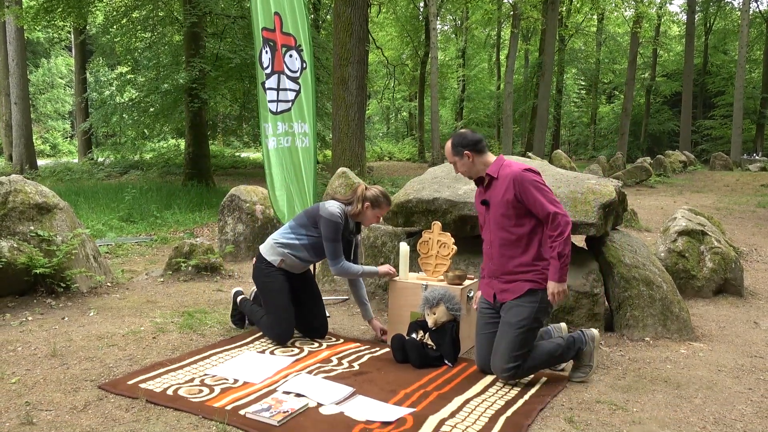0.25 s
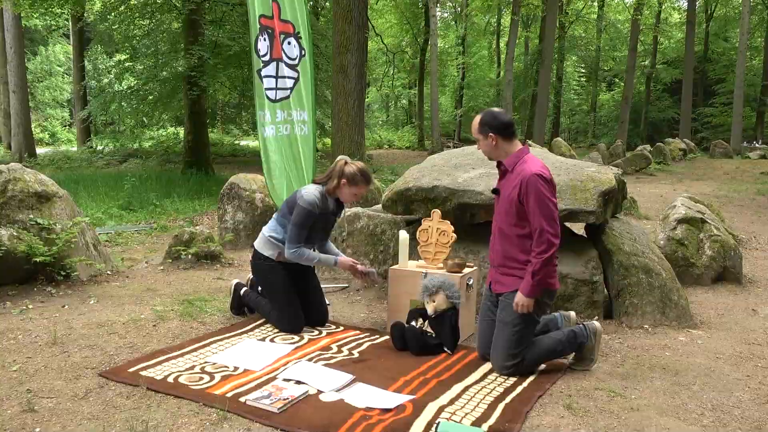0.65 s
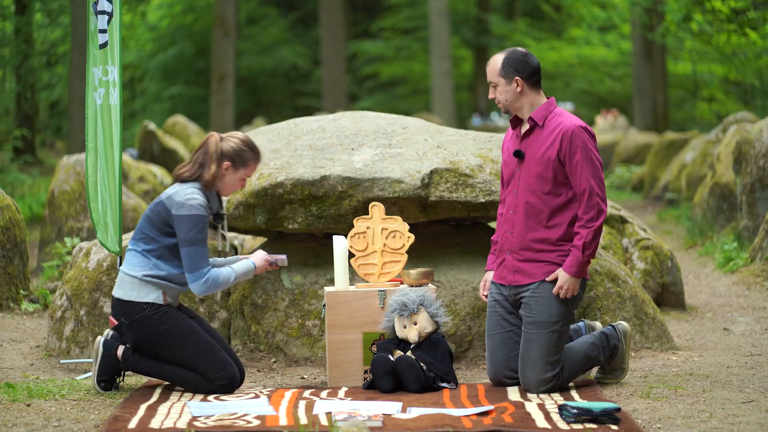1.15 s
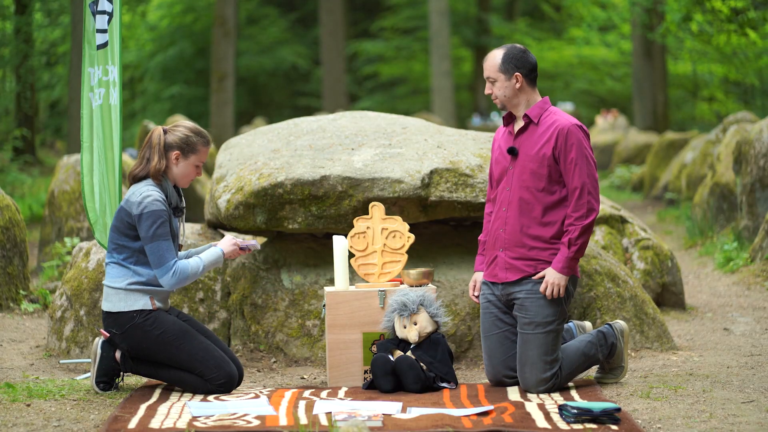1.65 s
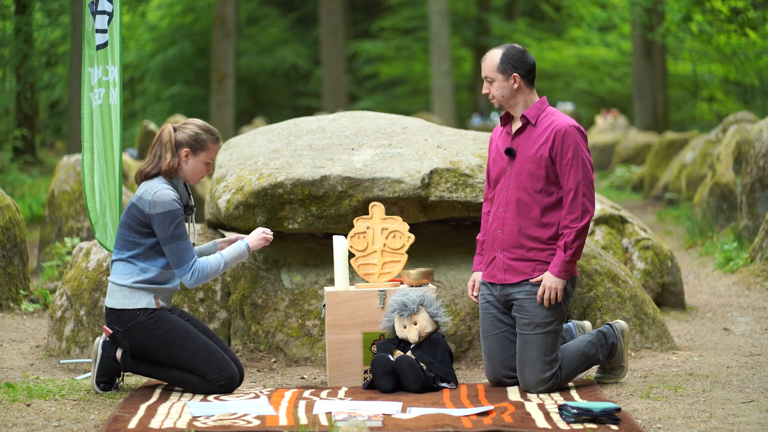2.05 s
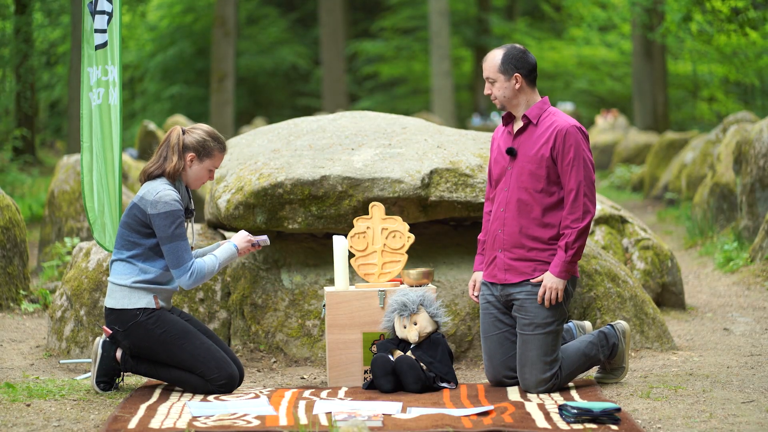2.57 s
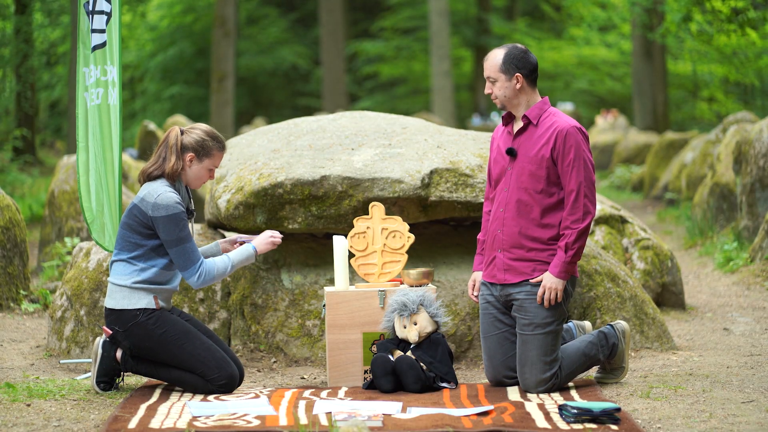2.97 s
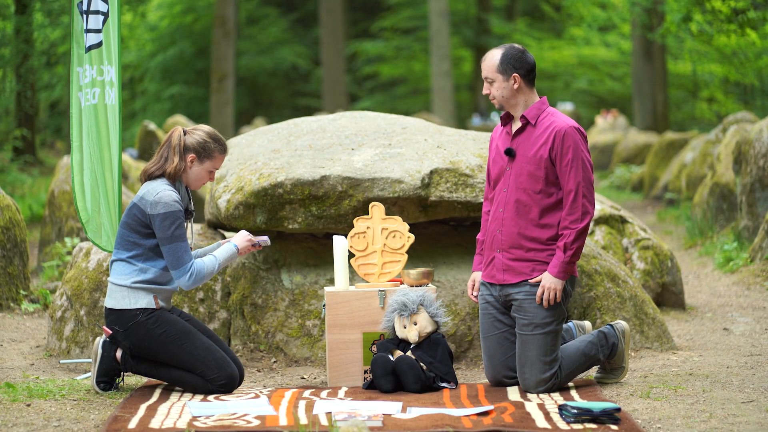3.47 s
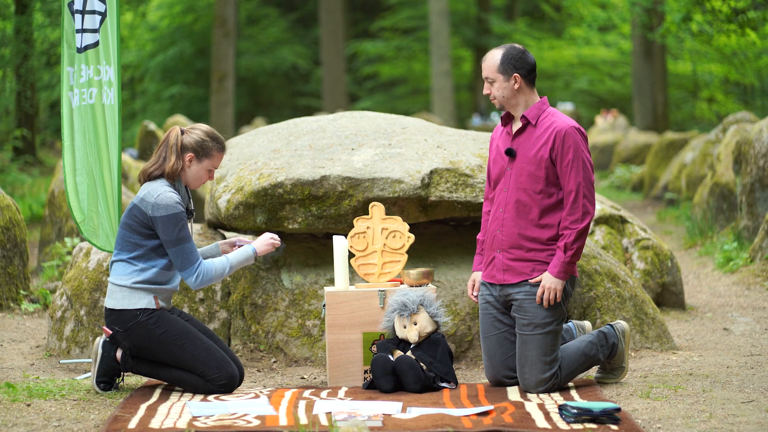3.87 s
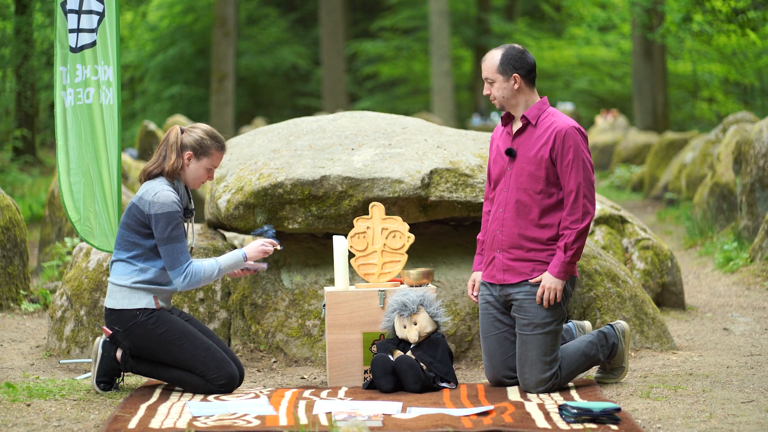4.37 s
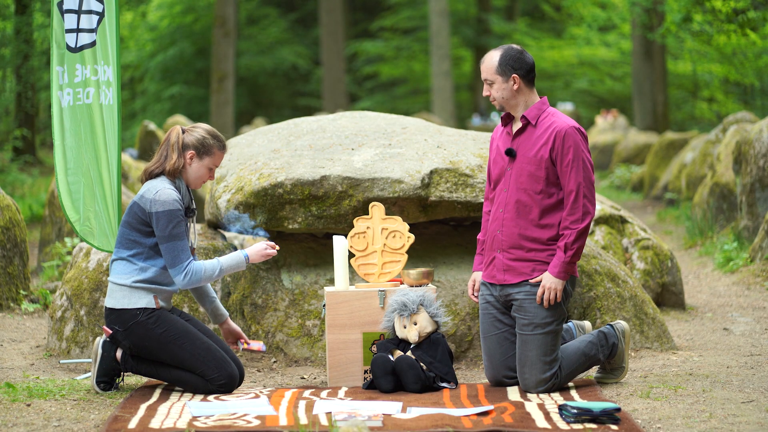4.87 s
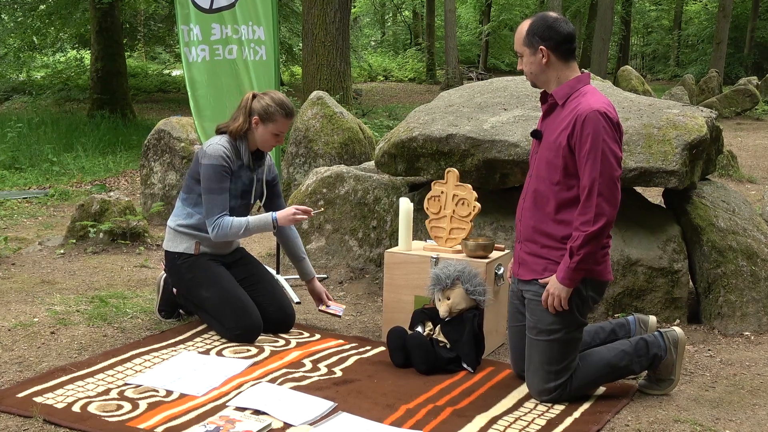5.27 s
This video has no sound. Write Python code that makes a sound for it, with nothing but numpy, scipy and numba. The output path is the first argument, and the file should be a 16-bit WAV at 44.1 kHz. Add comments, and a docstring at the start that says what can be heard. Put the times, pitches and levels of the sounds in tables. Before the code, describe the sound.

In a birdsong-filled forest clearing, a match scrapes a matchbox three times, the last harshest, then a faint hiss of flame.

```python
"""A forest clearing: birds sing and a far engine drones while a match is struck, microphone worn on the chest.
Head and grit: random clicks ring two gliding box notes, with slips and snaps as separate knocks.
Three strokes, with a light brush before the second; after the last, filtered clicks hiss as the flame.
The sleeve rubs as clumped clicks through cloth resonances; small ticks and soft rustles sit close by.
Leaves are coloured noise, the engine two wavering sines, the birds gliding whistles with an echo."""
import sys
import numpy as np
from scipy import signal
from scipy.fft import rfft, irfft
from scipy.io import wavfile
from numba import njit

SR = 44100
rng = np.random.default_rng(int(sys.argv[2]) if len(sys.argv) > 2 else 0)


def bounce(signal):
    """Save signal as a 16-bit WAV file at the path given by the first command-line argument."""
    frames = np.transpose(np.atleast_2d(signal))
    limited = np.clip(frames, -1, 1)
    pcm = np.round(limited * 32767).astype(np.int16)
    wavfile.write(sys.argv[1], SR, pcm)


N = 243592
TIME = np.arange(N) / SR


def from_db(db):
    """Decibels to an amplitude factor."""
    return 10 ** (np.asarray(db) / 20)


def rms_one(x):
    """Scale a sound to rms 1."""
    return x / np.sqrt(np.mean(x ** 2) + 1e-20)


def in_time(tables, fade_s=.006):
    """Join the columns of short tables along the time line, after a gate that is open inside each table."""
    start_s, *columns = np.transpose(np.vstack(tables))
    gate = np.zeros(N)
    for table in tables:
        first_s, last_s = table[0][0], table[-1][0]
        gate += np.interp(TIME, [first_s - fade_s, first_s, last_s, last_s + fade_s], [0, 1, 1, 0])
    return [gate] + [np.interp(TIME, start_s, column) for column in columns]


def swell(loudest_s, level_db, rise_s, fall_s):
    """Gain that climbs 20 dB to its top and falls 20 dB again, straight in dB; signs of the times ignored."""
    before = (loudest_s - TIME) / abs(rise_s)
    after = (TIME - loudest_s) / abs(fall_s)
    return from_db(level_db - 20 * np.where(TIME < loudest_s, before, after))


def colour(x, spectrum):
    """Filter a sound by a curve of dB over frequency, joined on a log axis; rms 1."""
    hz, db = np.transpose(spectrum)
    grid_hz = np.maximum(np.arange(len(x) // 2 + 1) * SR / len(x), 1)
    gain_db = np.interp(np.log(grid_hz), np.log(hz), db)
    return rms_one(irfft(rfft(x) * from_db(gain_db), len(x)))


def resonate(x, hz, width_hz):
    """Two-pole resonance, gain 1 on top."""
    r = np.exp(-np.pi * width_hz / SR)
    feed = np.array([1, 0, -1]) * (1 - r * r) / 2
    return signal.lfilter(feed, [1, -2 * r * np.cos(2 * np.pi * hz / SR), r * r], x)


def resonate_twice(x, hz, width_hz):
    """Two equal fixed resonances in a row for steeper sides; rms 1."""
    return rms_one(resonate(resonate(x, hz, width_hz), hz, width_hz))


@njit
def gliding(x, hz, width_hz, rate):
    """Resonance whose centre moves sample by sample."""
    out, r = np.zeros(len(x)), np.exp(-np.pi * width_hz / rate)
    for i in range(2, len(x)):
        turn = 2 * r * np.cos(2 * np.pi * hz[i] / rate)
        out[i] = x[i] - x[i - 2] + turn * out[i - 1] - r * r * out[i - 2]
    return out


def glide_twice(x, hz, width_hz):
    """Two equal moving resonances in a row for steeper sides; rms 1."""
    return rms_one(gliding(gliding(x, hz, width_hz, SR), hz, width_hz, SR))


def drift(rate_hz):
    """Slow random wander: noise through two low-pass poles, rms 1, started a second early to settle."""
    r = np.exp(-2 * np.pi * rate_hz / SR)
    return rms_one(signal.lfilter([1], [1, -2 * r, r * r], rng.standard_normal(N + SR))[SR:])


def grains(per_s, spread_db):
    """Random clicks of uneven size and either sign; rms 1."""
    sizes = from_db(spread_db * np.minimum(rng.exponential(1, N), 5)) * rng.choice([-1, 1], N)
    return rms_one(sizes * (rng.random(N) < per_s / SR))


def knocks(rows, t60_s, sharpness, skirt):
    """Each row (start_s, peak_db, pitch_hz): a hard contact and dying rattle through two resonances."""
    out, after_s = np.zeros(N + SR), np.arange(SR // 12) / SR
    noise = rng.standard_normal((len(rows), len(after_s)))
    for (start_s, peak_db, hz), push in zip(rows, noise):
        push[0] = 5   # the first contact
        width_hz = hz / sharpness
        ring = resonate(push * from_db(-60 * after_s / t60_s), hz, skirt * width_hz)
        ring = resonate(ring, hz, width_hz)
        at = round(start_s * SR)
        out[at:at + len(after_s)] += from_db(peak_db) * ring / abs(ring).max()
    return out[:N]


# the clearing, lifted once the striking starts: start_s [s], air_db [dB], rumble_db [dB]
CLEARING = [(0, -67, -66), (.5, -68, -67.5), (1, -65, -70.5), (1.7, -67, -68), (1.79, -58.5, -59),
            (2.1, -58.5, -54), (3.7, -58, -51.5), (4.3, -55, -52), (4.7, -54, -52.5), (5.1, -55, -54.5),
            (5.52, -57.5, -51.5)]
# tone of the air: pitch_hz [Hz], density_db [dB per Hz]
AIR_TONE = [(53, -18.5), (90, -5.5), (103, -9.5), (192, -12.5), (353, -13), (393, -14.5), (510, -12.5),
            (896, -12.5), (1640, -18), (3220, -29.5), (5200, -32), (8500, -35), (15000, -36.5),
            (16000, -41.5)]
# far engine, its two lowest orders: pitch_hz [Hz], level_db [dB over the rumble]
ENGINE_ORDERS = [(34.5, -4.5), (70.5, 0.5)]
# a dull hum far off: loudest_s [s], level_db [dB], rise_s [s per 20 dB], fall_s [s per 20 dB]
PASSING_HUM = (0.92, -65.5, 0.14, 1.4)


def forest():
    """Leaves and far traffic as coloured noise over a ground rumble, with an engine wavering in it."""
    _, air_db, rumble_db = in_time([CLEARING])
    air = colour(rng.standard_normal(N), AIR_TONE) * from_db(air_db + .7 * drift(3))
    warped_s = np.cumsum(1 + .01 * drift(2)) / SR   # engine speed wavers by 1 %
    engine = sum(from_db(level_db + 2.0 * drift(8.3)) * np.sin(2 * np.pi * hz * warped_s)
                 for hz, level_db in ENGINE_ORDERS)
    ground = from_db(-7) * resonate_twice(rng.standard_normal(N), 42, 50)
    hum = swell(*PASSING_HUM) * rms_one(resonate(rng.standard_normal(N), 364, 48))
    return air + from_db(rumble_db) * (engine + ground) + hum


# far birds blur into a high haze that rises, then slowly fades:
# loudest_s [s], level_db [dB], rise_s [s per 20 dB], fall_s [s per 20 dB, sign ignored by swell()]
BIRD_HAZE = (2.1, -78, 4, -12.5)
# single notes: start_s [s], length_s [s], first_hz, middle_hz, last_hz [Hz], level_db [dB]
BIRD_NOTES = [(.052, .065, 5600, 4750, 3500, -71), (.158, .062, 6000, 4750, 3500, -71),
              (.495, .07, 4350, 4550, 5500, -71), (.668, .068, 4350, 4550, 5600, -73),
              (.84, .06, 4300, 4550, 5300, -72), (1.02, .06, 4300, 4600, 5500, -74),
              (1.315, .03, 5900, 4900, 4300, -74), (1.575, .027, 5800, 4700, 4000, -74),
              (1.695, .06, 3220, 3220, 3220, -78), (2.105, .085, 4150, 4150, 4150, -73),
              (2.175, .04, 7100, 5300, 4400, -69), (2.28, .05, 7000, 7350, 7450, -75),
              (2.335, .05, 7400, 5300, 4300, -69), (2.425, .07, 6300, 7200, 7300, -73),
              (2.497, .05, 7200, 5200, 4200, -69), (2.66, .045, 7300, 5700, 4500, -71),
              (4.06, .14, 2480, 2470, 2460, -65), (4.24, .11, 2460, 2450, 2440, -67),
              (4.58, .12, 2270, 2260, 2240, -65)]
ECHO_DB, ECHO_T60_S = -38, .4   # gain and decay of what the trunks return


def birds():
    """Near-sine whistles gliding through three pitches, with an echo off the trunks and a haze of noise."""
    notes = np.zeros(N)
    flutter_db = 2.5 * drift(90)   # leaves and moving air make the level flutter
    for start_s, length_s, first_hz, middle_hz, last_hz, level_db in BIRD_NOTES:
        u = np.arange(round(length_s * SR)) / (length_s * SR)
        hz = np.polyval(np.polyfit([0, .5, 1], [first_hz, middle_hz, last_hz], 2), u)
        whistle = np.sin(np.pi * u) ** .5 * np.sin(2 * np.pi * np.cumsum(hz) / SR)
        at = round(start_s * SR)
        notes[at:at + len(u)] += from_db(level_db + flutter_db[at:at + len(u)]) * whistle
    tail_s = np.arange(SR // 4) / SR
    tail = rng.standard_normal(SR // 4) * from_db(-60 * tail_s / ECHO_T60_S)
    haze = swell(*BIRD_HAZE) * resonate_twice(rng.standard_normal(N), 5400, 3200)
    return notes + haze + from_db(ECHO_DB) * signal.fftconvolve(notes, tail)[:N]


# soft rustles of hands: loudest_s [s], level_db [dB], rise_s, fall_s [s per 20 dB]
HAND_RUSTLES = [(.262, -62.5, 0.033, 0.1), (.54, -65, 0.017, 0.15), (.72, -75, 0.12, 0.25),
                (.91, -64, 0.19, 0.05), (4.972, -50, 0.065, 0.073), (5.08, -58, .08, 0.18),
                (5.3, -65, .2, 0.17), (5.51, -56, 0.05, 0.054)]
UPPER_DB, CRACKLE_DB = -3.5, -13.5   # over the low note of the rustle
CRACKLES_PER_S = 170


def hands():
    """Skin and card rubbing softly on two notes of the box, with loose crackles."""
    rub = grains(3700, 3.3)
    low = resonate_twice(rub, 900, 380)
    upper = resonate_twice(rub, 2100, 610)
    crackle = rms_one(resonate(grains(CRACKLES_PER_S, 1.6), 2700, 4000))
    rustle = low + from_db(UPPER_DB) * upper + from_db(CRACKLE_DB) * crackle
    return sum(swell(*row) for row in HAND_RUSTLES) * rustle


# small ticks of fingers, sleeve and match head, a dull note with a snap on top:
# start_s [s], note_db [dB peak], note_hz [Hz], snap_db [dB peak], snap_hz [Hz]
SMALL_TICKS = [(0.111, -71, 900, -55.5, 5470), (0.315, -72, 818, -55.5, 5200), (0.548, -56, 845, -63, 5400),
               (0.702, -52, 1000, -60.5, 2400), (0.727, -54, 1310, -62, 3500),
               (0.811, -52, 1800, -60, 4500), (0.876, -56, 1400, -51, 7500),
               (0.886, -50, 1980, -55.5, 7100), (0.897, -67, 1000, -54, 8000), (0.91, -49, 1500, -50, 3020),
               (0.976, -62, 1500, -63, 7500), (1.251, -57, 1870, -70, 3500), (1.758, -44, 1410, -40, 5750),
               (2.577, -51, 1900, -60, 3500), (2.837, -42, 970, -46, 5000), (3.777, -39, 1520, -34, 4450),
               (0.939, -49, 1980, -54.5, 6120), (1.09, -39, 1680, -55, 3650), (1.32, -46, 1710, -68, 3500),
               (1.522, -54, 1400, -62, 3500), (1.864, -57, 683, -32, 3480), (1.971, -35, 2000, -36, 4760),
               (1.981, -42, 2220, -29.5, 5000), (2.032, -38, 755, -38.5, 5470),
               (2.058, -46, 970, -38.5, 4400), (2.392, -40, 730, -51, 4000), (2.56, -39, 1660, -43.5, 3630),
               (2.602, -43, 1690, -52, 3600), (2.732, -48, 1160, -46, 3320), (3.053, -30, 2100, -29, 4200),
               (3.122, -47, 880, -38.5, 5560), (3.144, -46, 880, -40, 3680), (3.158, -37.5, 760, -42, 3900),
               (3.25, -46.5, 800, -55, 3500), (3.462, -44, 836, -39, 3930), (3.869, -26, 2370, -40, 3700),
               (3.938, -35.5, 732, -34, 4540), (3.998, -56, 800, -36.5, 4430), (4.044, -42, 690, -52, 3530),
               (4.907, -52.5, 620, -44, 6040), (4.954, -61.5, 842, -47.5, 3900),
               (4.965, -57.5, 870, -56, 3420)]
NOTE_T60_S, NOTE_SHARPNESS = 0.025, 2.7
TOP_T60_S, TOP_SHARPNESS = 0.015, 2.2


def ticks():
    """A small contact rings a dull note and a snap at the same moment."""
    rows = np.array(SMALL_TICKS)
    notes = knocks(rows[:, :3], NOTE_T60_S, NOTE_SHARPNESS, 1.8)
    tops = knocks(rows[:, [0, 3, 4]], TOP_T60_S, TOP_SHARPNESS, 1.4)
    return notes + tops


# sleeve swinging back past the chest, one table a swing: start_s [s], rub_db [dB], treble_db [dB]
SLEEVE_SWINGS = [
    [(1.83, -52, -58), (1.856, -43.5, -55), (1.9, -43, -57), (1.936, -52.5, -64), (1.968, -44, -54),
     (2.042, -46.5, -60), (2.084, -72, -90)],
    [(2.93, -38, -59), (2.95, -50, -60.5), (2.992, -39, -48.5), (3.035, -40.5, -51.5), (3.065, -44, -60),
     (3.104, -42.5, -47), (3.13, -43.5, -48.5), (3.2, -70.5, -86)],
    [(3.85, -34.5, -51.5), (3.882, -45, -56), (3.94, -39.5, -41), (3.975, -44.5, -58), (4.0, -45.5, -53),
     (4.048, -52, -60), (4.1, -77, -64.5)],
]
# resonances of the cloth fold: pitch_hz [Hz], width_hz [Hz], level_db [dB]
CLOTH_FOLD = [(696, 570, 6.5), (1220, 1300, 0.5), (1940, 330, -0.5), (2570, 120, -51)]
# tone of the cloth treble: pitch_hz [Hz], density_db [dB per Hz]
CLOTH_TREBLE = [(1650, -24.5), (2800, -71.5), (3170, -7), (4500, 0), (8060, -12.5), (12700, -13.5),
                (14400, -16), (16000, -19)]
# the chest push of each swing: loudest_s [s], level_db [dB], rise_s, fall_s [s per 20 dB]
CHEST_PUSHES = [(1.88, -35.5, 0.21, .3), (2.961, -31, 0.083, 0.15), (3.85, -34, 0.025, 0.16)]


def sleeve():
    """Fibres catch in clumps and ring the fold of cloth; the swing pushes the microphone slowly."""
    gate, rub_db, treble_db = in_time(SLEEVE_SWINGS, fade_s=0.052)
    fibres = grains(4000, 4.0) * from_db(1.3 * drift(80))
    body = rms_one(sum(from_db(level_db) * resonate(resonate(fibres, hz, width_hz), hz, 2 * width_hz)
                       for hz, width_hz, level_db in CLOTH_FOLD))
    treble = colour(grains(20000, 5.3) * from_db(1.7 * drift(30)), CLOTH_TREBLE)
    push = np.sin(2 * np.pi * 9 * np.cumsum(1 + 0.186 * drift(3.14)) / SR)   # wanders around 9 Hz
    pushes = sum(swell(*row) for row in CHEST_PUSHES) * push
    return gate * (from_db(rub_db) * body + from_db(treble_db) * treble) + pushes


# head dragged over the grit, one table a contact:
# start_s [s], box_db [dB], box_hz [Hz], lower_db [dB, lower note over the box note], grit_db [dB]
DRAG_STROKES = [
    [(1.75, -60, 1410, 3, -68), (1.76, -46, 1420, 0.5, -49), (1.772, -51, 1440, 6.5, -54.5),
     (1.786, -35, 1470, 0, -35.5), (1.8, -33, 1260, -12.5, -44.5), (1.812, -28, 1600, -24, -36),
     (1.822, -34, 1820, -5, -55), (1.845, -62, 1600, -5, -75)],
    [(2.595, -79, 1680, 0, -100), (2.622, -57, 1670, -2, -50), (2.635, -45.5, 1660, -0.5, -43.5),
     (2.66, -66, 1650, -28, -77)],
    [(2.81, -73, 940, -7, -84), (2.818, -52.5, 950, -25, -64), (2.85, -49, 1160, -8.5, -50.5),
     (2.878, -42, 1290, -5, -50.5), (2.886, -37.5, 1350, 5.5, -45), (2.9, -32, 1560, -3, -44),
     (2.912, -34, 1900, 1, -34.5), (2.924, -53, 1900, -10, -60), (2.945, -62, 1800, 8, -73)],
    [(3.765, -59, 1020, -3, -68), (3.775, -57, 1070, -10, -55), (3.798, -36.5, 1320, 1, -45),
     (3.804, -39, 1400, 5, -38), (3.819, -51, 1300, 11, -36), (3.822, -36.5, 1200, -4.5, -21.5),
     (3.833, -17.5, 1090, -1.5, -13), (3.845, -41, 1170, -3, -41), (3.866, -48, 1290, -17, -47)],
]
# thud in the hand, one a contact: level_db [dB over the box]
HAND_THUDS_DB = [-29, -13, -23, -9.5]
# tone of the grit: pitch_hz [Hz], density_db [dB per Hz]
GRIT_TONE = [(1530, -40), (2600, -7), (2910, -1), (3750, 5), (4960, -3.5), (5870, 5), (6990, -7.5),
             (11500, -3), (16000, -8.5)]
# the head slips and the box rings: start_s [s], peak_db [dB], pitch_hz [Hz]
HEAD_SLIPS = [(1.776, -45, 553), (1.784, -26.5, 1440), (1.799, -24, 1174), (1.804, -24, 1240),
              (1.812, -21, 1540), (1.823, -29, 1460), (2.63, -38.5, 1560), (2.815, -37.5, 957),
              (2.845, -32.5, 1200), (2.856, -37, 1180), (2.882, -29, 1400), (2.899, -23, 1540),
              (2.907, -13.5, 1690), (2.918, -24.5, 1750), (3.779, -38.5, 912), (3.796, -37, 597),
              (3.804, -24.5, 577), (3.808, -26.5, 1720), (3.814, -21, 1427), (3.822, -16, 856),
              (3.837, -18.5, 1047), (3.84, -18, 2108)]
# grit snaps under the head: start_s [s], peak_db [dB, before the peaks are rounded], pitch_hz [Hz]
GRIT_SNAPS = [(1.7834, -10, 13800), (1.8004, -22, 13500), (1.8058, -33, 4320), (1.8126, -20, 3450),
              (1.8162, -21.5, 3230), (1.8229, -27, 3410), (2.626, -49, 5900), (2.6295, -32, 11500),
              (2.9002, -17, 6330), (2.91, -43, 4560), (2.9204, -30, 3100), (3.8053, -16, 10870),
              (3.8104, -8, 12100), (3.8148, -8, 12900), (3.8212, 1, 10890), (3.8232, 9, 11600),
              (3.8256, 0, 5760), (3.832, 2.5, 5800), (3.838, -2.5, 3400), (3.8416, 4, 12740)]
LOWER_BY_HZ, LOWEST_HZ = 816, 468   # the lower note of the box follows the upper, down to a floor
SLIP_T60_S, SLIP_SHARPNESS = 0.022, 4.4
SNAP_T60_S, SNAP_SHARPNESS = 0.0076, 0.96


def drag():
    """Rubbing: grit clicks ring two notes of the box and thud in the hand; slips and snaps stand out."""
    strokes = [[(*row, thud_db) for row in rows] for rows, thud_db in zip(DRAG_STROKES, HAND_THUDS_DB)]
    gate, box_db, box_hz, lower_db, grit_db, thud_db = in_time(strokes, fade_s=0.0063)
    clicks = grains(5000, 3.56) * from_db(3.8 * drift(330))
    upper = glide_twice(clicks, box_hz, 444.0)
    lower = glide_twice(clicks, np.maximum(box_hz - LOWER_BY_HZ, LOWEST_HZ), 330.)
    thud = resonate_twice(clicks, 240, 270)
    box = upper + from_db(lower_db) * lower + from_db(thud_db) * thud
    grit = colour(grains(9000, 3.9) * from_db(2.0 * drift(180)), GRIT_TONE)
    slips = knocks(HEAD_SLIPS, SLIP_T60_S, SLIP_SHARPNESS, 1.5)
    snaps = knocks(GRIT_SNAPS, SNAP_T60_S, SNAP_SHARPNESS, 6.1)
    return gate * (from_db(box_db) * box + from_db(grit_db) * grit) + slips + snaps


# tone of the hiss: pitch_hz [Hz], density_db [dB per Hz]
HISS_TONE = [(1290, -10), (2200, 14.5), (2800, -9.5), (3140, 6.5), (3870, 0.5), (7210, -10.5), (8370, -8),
             (10800, -13), (15100, -4), (16000, -0.5)]
# bands of the hiss, sliding down as the flame spreads: lighting_hz [Hz], slide [Hz per s],
# width_hz [Hz], loudest_s [s], lasts_s [s], level_db [dB over the hiss level]
FLAME_BANDS = [(5320, -1200, 3900, 4.47, 0.52, 2), (7820, -2100, 2000, 4.7, 0.27, 0.5),
               (11200, -2300, 2500, 4.45, 0.45, -3)]
LIGHTS_S, DIPS_S, HISS_DB, DIP_DB = 4.08, 4.98, -67, -69   # the base hiss dips slightly, then rises


def flare():
    """Gas hisses out of the burning head: dense coloured clicks, with bands that slide down and fade."""
    levels = [(LIGHTS_S, HISS_DB), (DIPS_S, HISS_DB), (DIPS_S + 0.059, DIP_DB), (N / SR, DIP_DB + 7)]
    gate, hiss_db = in_time([levels], fade_s=0.079)
    gas = colour(grains(17000, 1.5), HISS_TONE)
    sliding_s = np.clip(TIME - LIGHTS_S, 0, DIPS_S - LIGHTS_S)   # the slide stops at the dip
    bands = np.zeros(N)
    for lighting_hz, slide, width_hz, loudest_s, lasts_s, level_db in FLAME_BANDS:
        bell = np.exp(-((TIME - loudest_s) / lasts_s) ** 2)
        band = glide_twice(gas, lighting_hz + slide * sliding_s, float(width_hz))
        bands += from_db(level_db) * bell * band
    return gate * from_db(hiss_db + 1.5 * drift(25)) * (from_db(-0.5) * gas + bands)


def scene():
    """Everything adds up at one microphone on the chest."""
    return (drag() + ticks() + sleeve() + hands() + flare() + forest() + birds())[None]


CUTOFF_HZ = 16800


def record(dry):
    """Peaks are rounded towards 0.6 of full scale, then a steep low-pass cuts the top."""
    rounded = .6 * np.tanh(dry / .6)
    return signal.sosfilt(signal.cheby2(16, 80, CUTOFF_HZ, fs=SR, output="sos"), rounded)


dry = scene()
out = record(dry)
bounce(out)
```